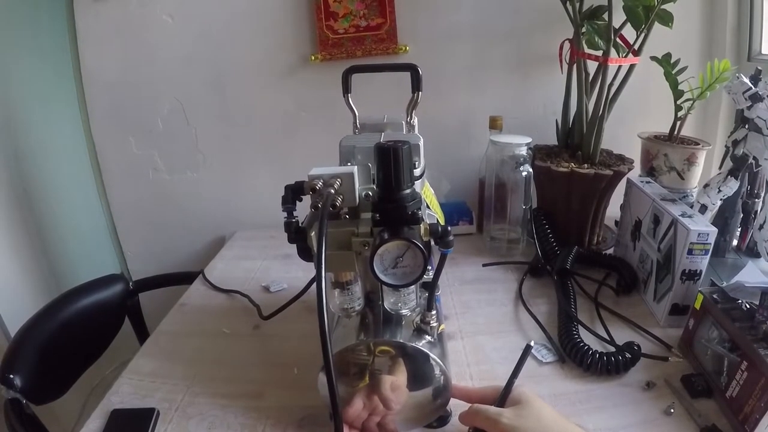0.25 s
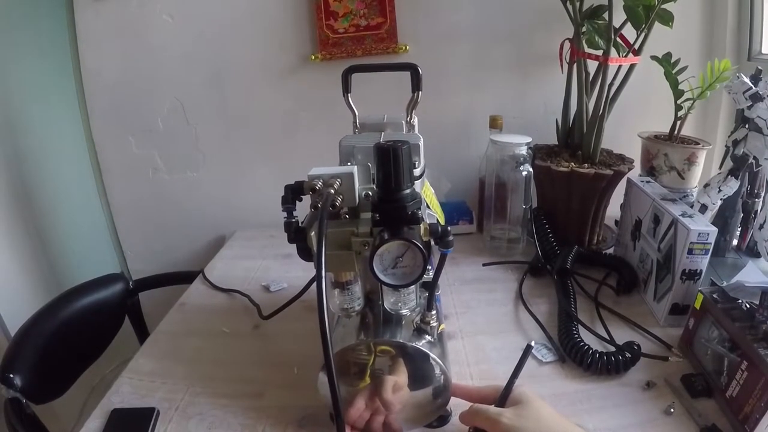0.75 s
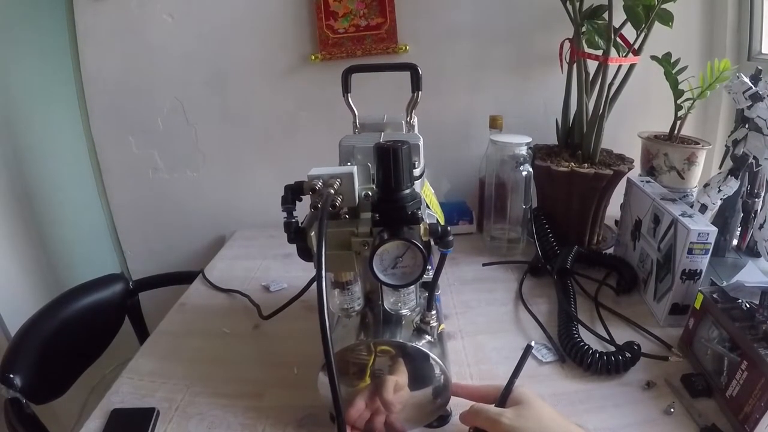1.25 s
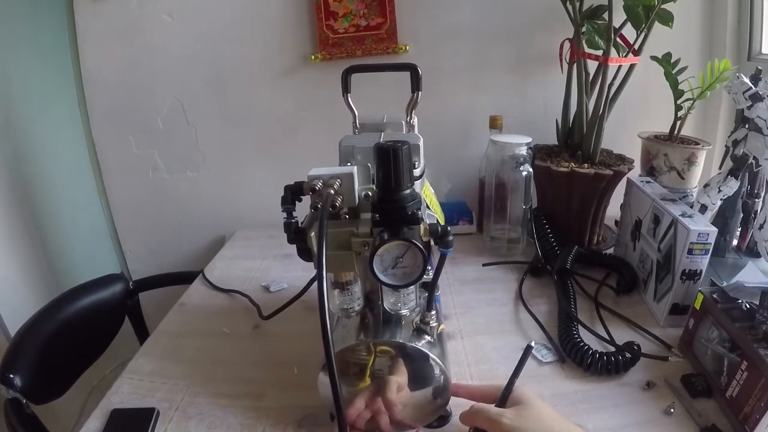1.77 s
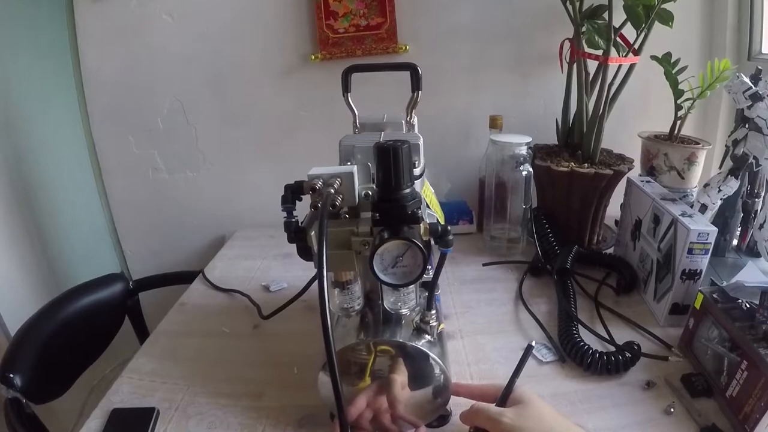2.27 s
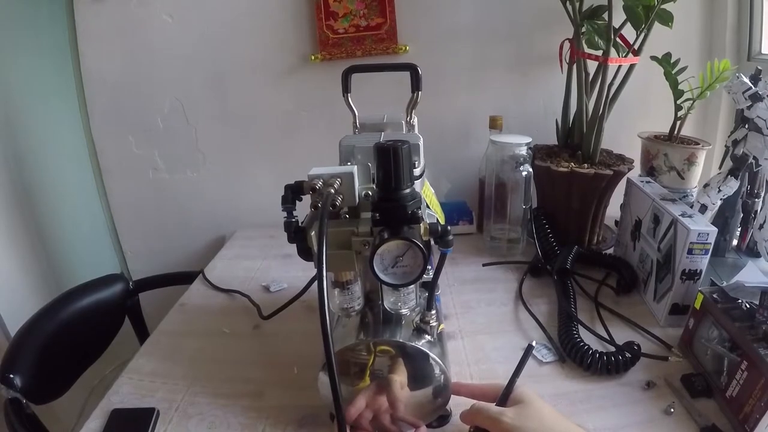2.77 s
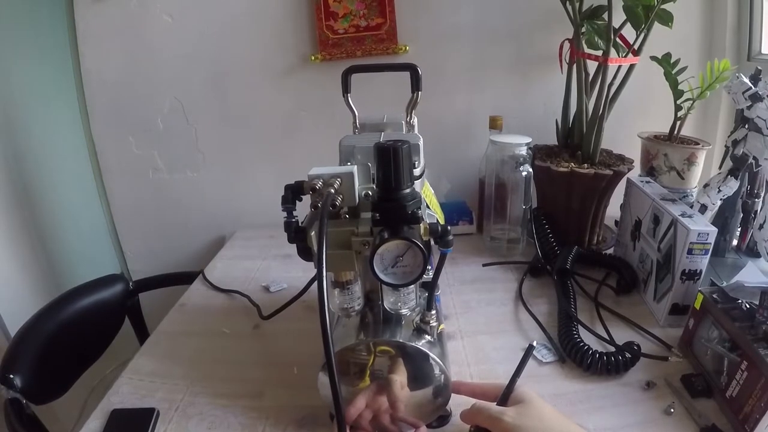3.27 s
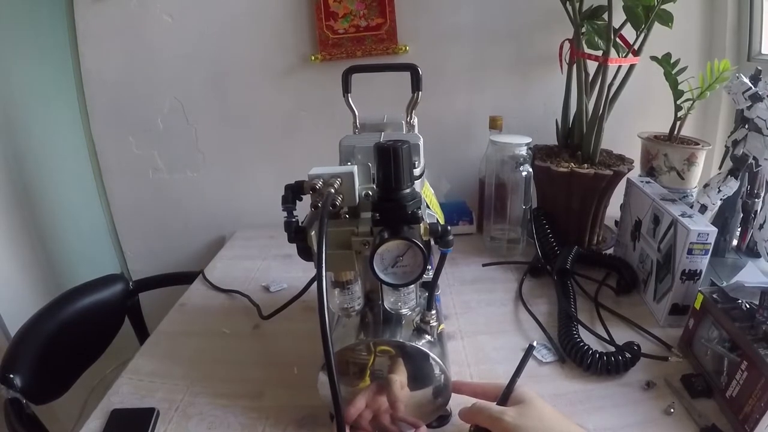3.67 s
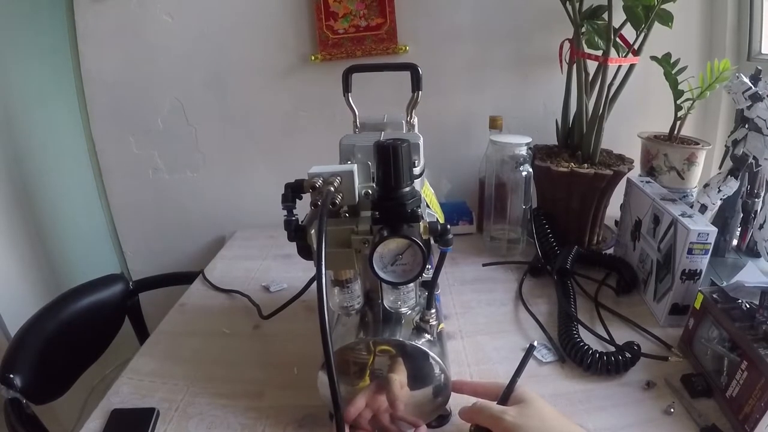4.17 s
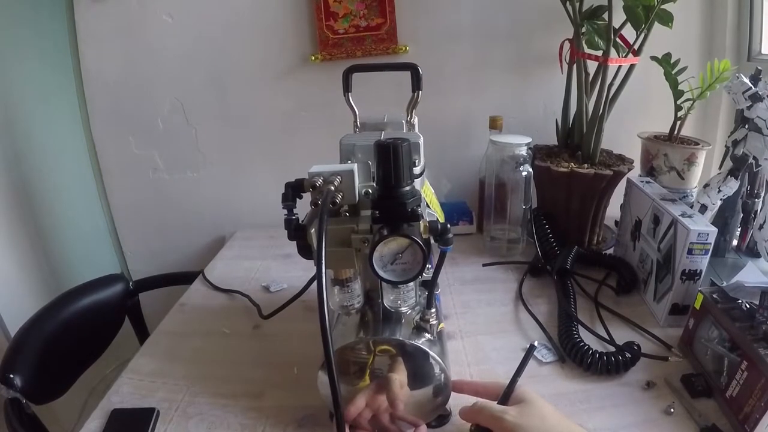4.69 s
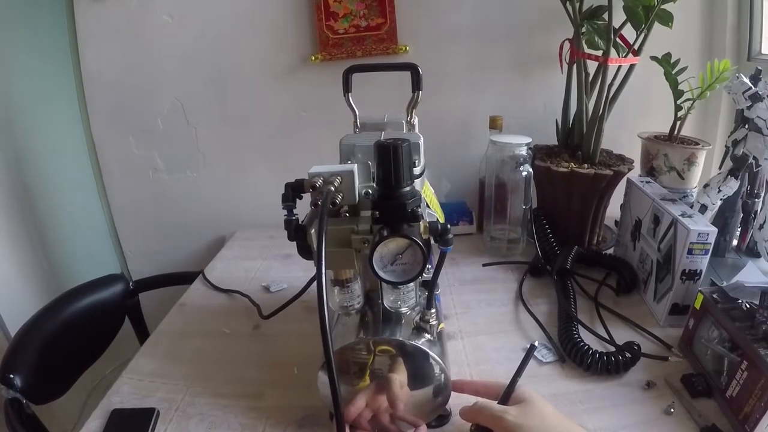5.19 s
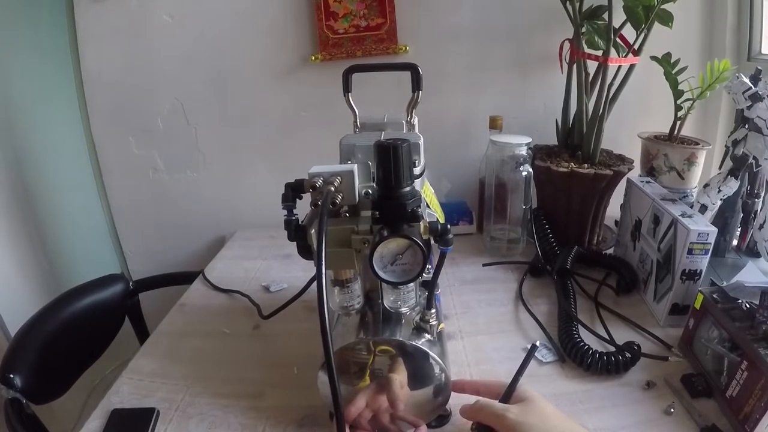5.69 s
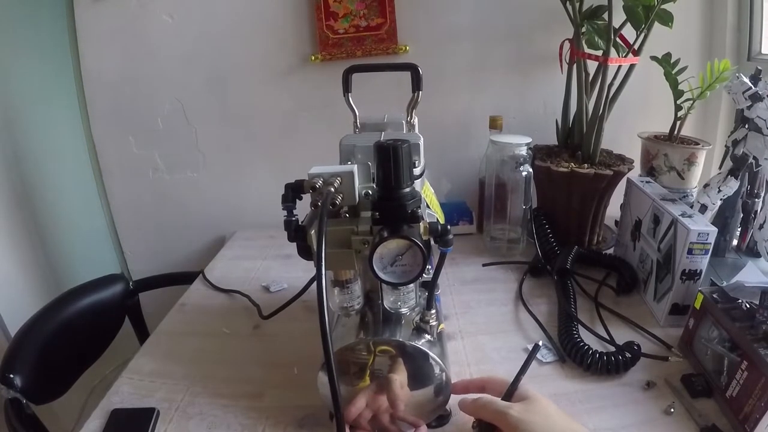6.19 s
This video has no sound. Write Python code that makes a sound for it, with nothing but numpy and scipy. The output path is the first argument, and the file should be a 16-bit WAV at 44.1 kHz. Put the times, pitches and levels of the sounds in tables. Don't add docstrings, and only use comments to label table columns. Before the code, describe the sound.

A small piston compressor runs without pause on a wooden desk in a room, very close to the microphones. A deep hum beats against the fast motor throb, with dull piston knocks, tiny valve clicks, airy rumble and a thin rattle of loose metal. The hum is strongest early; after about four seconds it sinks, the throb turns higher and firmer, and faint air puffs join.

```python
import sys
import numpy as np
from scipy import signal
from scipy.fft import rfft, irfft
from scipy.io import wavfile

SR = 44100
rng = np.random.default_rng(int(sys.argv[2]) if len(sys.argv) > 2 else 0)


def output_pcm(signal):
    pcm = np.clip(np.atleast_2d(signal).T, -1, 1) * 32767
    wavfile.write(sys.argv[1], SR, np.round(pcm).astype(np.int16))


def invert_db(x):
    u = np.asarray(x, float) / 20
    return 10 ** u


N = 284004
TIME, HZ = np.arange(N) / SR, np.arange(N // 2 + 1) * SR / N + 1e-3


def in_time(rows):
    time_s, *columns = np.transpose(rows)
    return [np.interp(TIME, time_s, column) for column in columns]


def at_hz(rows):
    hz, value = np.transpose(rows)
    return np.interp(np.log(HZ), np.log(hz), value)


def shaped(x, gain):
    y = irfft(rfft(x) * gain, N)
    return y / np.sqrt(np.mean(y ** 2))


def band(x, low_hz, high_hz, order=2):
    sos = signal.butter(order, [low_hz, high_hz], "band", fs=SR, output="sos")
    return signal.sosfilt(sos, x)


def drift(rate_hz):
    knots = rng.standard_normal(int(N / SR * rate_hz) + 2)
    return np.interp(TIME * rate_hz, np.arange(len(knots)), 1.2 * knots)


def once_a_turn(crank, angle):
    return np.diff(np.floor(crank - angle), prepend=-1) > 0


# (time [s], speed [turns/s])
CRANK_SPEED = [(0, 21.94), (.5, 21.928), (2, 21.929), (3.1, 21.938), (3.7, 21.948), (4.3, 21.962),
               (6.44, 21.965)]


def crank_angle():
    start_turns = -.011
    return start_turns + np.cumsum(in_time(CRANK_SPEED)[0]) / SR


# (time [s], lead [turns])
HUM_LEAD_TURNS = [(0, -.06), (.4, .18), (1, .28), (2, .34), (2.8, .25), (3.9, .2), (4.4, .27), (6.44, .34)]


def hum_angle():
    hum_hz = 100
    return hum_hz * TIME + in_time(HUM_LEAD_TURNS)[0]


# (time [s], share [0-1])
HAND_WEIGHT = [
    (0, 1),
    (.25, 0.2),
    (.55, 0.01),
    (2.15, 0),
    (2.5, .5),
    (3.7, 0.42),
    (4.15, .95),
    (4.4, 0.95),
    (6.44, 0.98),
]
# (weight share [0-1], hum [dB], fourth order [dB], sixth order [dB], buzz [dB])
DESK_RESPONSE = [
    (0, -13, -24.5, -27, -41),
    (0.499, -14.5, -20, -19.5, -44.5),
    (1, -22.5, -17.5, -14.5, -49.5),
]


def carried():
    share, *columns_db = np.transpose(DESK_RESPONSE)
    weight = in_time(HAND_WEIGHT)[0]
    return [np.interp(weight, share, db) for db in columns_db]


# (frequency [Hz], density [dB per Hz])
RUMBLE_SPECTRUM = [(15, 2), (30, 0.5), (60, 5), (130, -2), (200, -3.5), (420, -10.5), (650, -9.5),
                   (800, -12.5), (1050, -25.5), (1650, -30), (1900, -30.5), (2300, -32.5), (2700, -41.5),
                   (5000, -58.5)]


def rumble():
    noise = rng.standard_normal((3, N))
    return shaped(noise, invert_db(at_hz(RUMBLE_SPECTRUM))) * invert_db(-26.0 + 0.6 * drift(17))


# (crank angle [turns], centre [Hz], width [Hz], level [dB], decay [turns])
AIR_PUFFS = [(.39, 3800, 280, -48, .2), (.8, 3820, 280, -48.5, .13), (.41, 5080, 320, -46, .12)]


def puffs(crank, pressed):
    rise_turns = .03
    out, white = 0, rng.standard_normal((3, N))
    for angle, hz, width_hz, db, decay_turns in AIR_PUFFS:
        since = (crank - angle) % 1
        envelope = (1 - np.exp(-since / rise_turns)) * np.exp(-since / decay_turns)
        air = band(white, hz - width_hz / 2, hz + width_hz / 2)
        out = out + invert_db(db + 1.5 * drift(20)) * envelope * air / air.std()
    return pressed * out


# (crank angle [turns], low [Hz], high [Hz], level [dB])
PISTON_KNOCKS = [(0.059, 700, 960, -23), (0.26, 770, 960, -26), (0.67, 640, 960, -21),
                 (.4, 1050, 1610, -28.5), (0.52, 1450, 2060, -35.5)]


def knocks(crank, shift):
    loaded_gain_db = 3.5
    out = 0
    for angle, low_hz, high_hz, db in PISTON_KNOCKS:
        force = invert_db(db + loaded_gain_db * shift + .6 * drift(20))
        clicks = once_a_turn(crank, angle) * force
        out = out + band(10 * clicks + 1e-18, low_hz, high_hz)
    return out


# (crank angle [turns], force [dB], how squarely it lands [0-1])
VALVE_CONTACTS = [(0.121, -3, 0.07), (0.199, -11, 0), (0.4, -3.5, 0.91), (0.481, -8, 0.4),
                  (0.652, -19, 0.3), (0.849, -2.5, 0.83), (0.972, -8, 0)]
# (frequency [Hz], level [dB], t60 [s])
HEAD_MODES = [(1220, -26.5, 0.055), (1198, -10.5, 0.12), (1249, -6.5, 0.25), (1295, -2, 0.02),
              (1533, 0.5, 0.037), (1518, -3, 0.086), (1576, -4, 0.19), (1632, 4.5, 0.1), (1726, 2, 0.26),
              (1930, -9, 0.043), (2167, -6, 0.046), (2252, 2, 0.13)]


def valves(crank, hum):
    strikes = []
    for angle, db, _ in VALVE_CONTACTS:
        at = np.flatnonzero(np.diff(np.floor(crank - angle)) > 0)
        chance = rng.standard_normal((len(at), 2))
        jitter_samples = (1.2 * chance[:, 0]).astype(int)
        at = np.clip(at + jitter_samples, 0, N - 1)
        sway = 1 + 0.07 * np.cos(2 * np.pi * hum[at])
        strikes.append((at, invert_db(db + .5 * chance[:, 1]) * sway))
    square = np.array(VALVE_CONTACTS)[:, 2]
    mode_shapes = square + rng.uniform(-0.99, 1, (len(HEAD_MODES), len(VALVE_CONTACTS)))
    out = 0
    for (hz, db, t60_s), shape in zip(HEAD_MODES, mode_shapes):
        clicks = np.full(N, 1e-18)
        for (at, force), share in zip(strikes, shape / np.sqrt(np.mean(shape ** 2))):
            clicks[at] += share * force
        r, w = invert_db(-60 / (t60_s * SR)), 2 * np.pi * hz / SR
        ring = signal.lfilter([0, np.sin(w)], [1, -2 * r * np.cos(w), r * r], clicks)
        out = out + invert_db(db) * ring
    out = band(out, 1000, 1900, order=4)
    return out / out.std()


# (frequency [Hz], density [dB per Hz])
BUZZ_LIGHT = [(1410, -45.5), (2400, -12.5), (2910, -7.5), (3160, -8), (3530, -4.5), (4010, -2), (4720, -4),
              (5130, 0.5), (6270, -2.5), (6700, 0), (7890, -10.5), (9790, -12.5), (11100, -30.5),
              (12100, -17), (14200, -30.5)]
BUZZ_HEAVY = [(1410, -35), (2400, -11), (2530, -18), (2910, -8), (3810, -2.5), (4040, -5), (4720, -8),
              (5130, -3), (5600, -5), (6950, -3.5), (8130, -12.5), (8560, -10), (9360, -14), (12100, -20),
              (14200, -36.5)]
# (frequency [Hz], width [Hz], level [dB])
SHELL_LIGHT = [(3160, 54, 10), (3260, 37, 4.5), (3820, 190, 3), (5220, 32, 6), (6090, 57, 8),
               (6700, 91, 5.5), (7320, 35, 9), (8450, 79, 5.5), (9900, 64, 3), (12200, 200, -2)]
SHELL_HEAVY = [(3200, 60, 6.5), (3870, 320, 2.5), (5150, 220, 6.5), (5950, 150, 7), (6550, 120, 5),
               (7350, 40, 4), (8500, 120, 0.5)]
# (lowest frequency [Hz], crank angle [turns], throb [dB])
LOOSE_PARTS = [(2200, 0.39, 1.5), (3120, 0.39, 1), (4420, 0.31, 1), (7600, 0.39, 2), (10400, .44, -0.5)]
SHIFT_S = [3.8, 4.46]


def buzz_colour(thicket, modes, spectrum):
    peaks = 1
    for hz, width_hz, db in modes:
        peaks = peaks + (invert_db(db) - 1) / (1 + (2 * (HZ - hz) / width_hz) ** 2)
    return thicket * peaks * invert_db(at_hz(spectrum)) / (1 + (HZ / 12500) ** 8)


def buzz(shaking, crank, hum, pressed):
    swing = np.abs(signal.hilbert(shaking))
    shared_db = 5.3 * np.log10(swing / swing.mean() + .1) + 0.6 * drift(40)
    burst_db = 2.3 * np.minimum(rng.exponential(1, N), 5)
    grains = rfft(rng.standard_normal((3, N)) * invert_db(burst_db))
    out, tops_hz = 0, [part[0] for part in LOOSE_PARTS[1:]] + [SR / 2]
    for (low_hz, angle, throb_db), top_hz in zip(LOOSE_PARTS, tops_hz):
        throb = throb_db * (1.5 - 1.8 * pressed) * np.cos(4 * np.pi * (crank - angle))
        part = irfft(grains * ((HZ > low_hz) & (HZ <= top_hz)), N)
        out = out + part * invert_db(shared_db + throb + 0.6 * drift(35))
    thicket = invert_db(3.15 * np.interp(HZ / 30, np.arange(800), rng.standard_normal(800)))
    light = shaped(out, buzz_colour(thicket, SHELL_LIGHT, BUZZ_LIGHT))
    heavy = shaped(out, buzz_colour(thicket, SHELL_HEAVY, BUZZ_HEAVY))
    beat_db, beat_turns, creep_db_per_s, flutter_db = 0.95, 0.32, 1.56, 0.6
    sway_db = beat_db * pressed * np.cos(2 * np.pi * (hum - 4.0 * crank - beat_turns))
    creep_db = creep_db_per_s * np.maximum(TIME - SHIFT_S[1], 0)
    level_db = carried()[3] + creep_db + sway_db + flutter_db * drift(20)
    return invert_db(level_db) * ((1 - pressed) * light + pressed * heavy)


ORDER_BLOWS = [(1, .8, .56, 0), (8, .2, .48, 0), (10, .54, .56, -.012), (17, .91, -.03, 0),
               (20, .18, 0, .08), (29, .02, .1, .03)]


def lines(table, crank, base, shift, wobble_db):
    step = 8
    out, time_s = 0, TIME[::step]
    for k, early_db, late_db in table:
        first, angle, lag, spread = [blow for blow in ORDER_BLOWS if blow[0] <= max(k, 1)][-1]
        turns = base[::step] + k * (crank[::step] - angle) + lag + spread * (k - first - 4) ** 2
        waver = np.interp(time_s * 6, np.arange(42), rng.standard_normal(42))
        level = invert_db(early_db + shift[::step] * (late_db - early_db) + wobble_db * waver)
        out = out + level * np.cos(2 * np.pi * turns)
    return np.sqrt(2) * signal.resample_poly(out, step, 1, padtype="smooth")[:N]


# (level before shift [dB], after [dB])
ORDER_LEVELS = [(-47.5, -43), (-24, -26), (-33, -37.5), (-30.5, -41.5), (-47.5, -41), (-47, -43.5),
                (-37.5, -37), (-50.5, -39.5), (-35.5, -34), (-39.5, -38), (-31, -29.5), (-30.5, -28),
                (-35, -32.5), (-33.5, -32), (-44, -38), (-35.5, -32), (-45, -39), (-49.5, -55.5),
                (-42, -38.5), (-57, -52.5), (-33.5, -34), (-43, -39.5), (-41, -38.5), (-42, -38),
                (-57, -62), (-41, -36.5), (-64, -58.5), (-62, -41), (-51.5, -49.5), (-44.5, -42.5)]
# (multiple, level before shift [dB], after [dB])
HUM_SIDEBANDS = [(-3, -46.5, -53.5), (-2, -42, -45.5), (-1, -58, -41), (1, -38.5, -37), (2, -32.5, -51.5),
                 (3, -52, -57.5), (4, -51.5, -43), (18, -33.5, -30), (20, -44.5, -44), (22, -39.5, -40.5),
                 (23, -48.5, -39.5), (24, -38, -41.5), (26, -45, -41)]
# (multiple, level before shift [dB], after [dB])
TWICE_HUM_LINES = [(-4, -33, -41.5), (0, -39.5, -47.5)]


def casing(crank, hum, shift):
    slot_slip_hz = .075
    slots = hum + slot_slip_hz * (TIME - 3.2)
    twice = 2 * hum - .25
    multiples = [k for k in range(1, 33) if k not in (4, 6)]
    orders = [(k, *levels_db) for k, levels_db in zip(multiples, ORDER_LEVELS)]
    tones = lines(orders, crank, 0 * crank, shift, wobble_db=0.78)
    tones = tones + lines(TWICE_HUM_LINES, crank, twice, shift, wobble_db=2.5)
    tones = tones + lines(HUM_SIDEBANDS[:7], crank, hum, shift, wobble_db=1.1)
    tones = tones + lines(HUM_SIDEBANDS[7:], crank, slots, shift, wobble_db=1.1)
    return tones * invert_db(1.5 * np.exp(-TIME / 0.17))


def desk(crank, hum):
    hum_db, fourth_db, sixth_db, _ = carried()
    parts = [(hum_db, hum), (fourth_db, 4 * crank - .3), (sixth_db, 6 * crank - .27)]
    return sum(np.sqrt(2) * invert_db(db + .5 * drift(8)) * np.cos(2 * np.pi * turns) for db, turns in parts)


# (frequency [Hz], left - right [dB])
PORT_BALANCE = [(40, -0.8), (100, -1.13), (200, -1.5), (370, -3.5), (520, -7), (700, -17.5), (900, -7.5),
                (1240, -5.5), (1550, -1), (5000, -1), (8000, -1.5), (14000, -8)]
# (frequency [Hz], lead [rad])
PORT_PHASE = [(150, 0), (450, -.12), (600, 0), (750, 1.4), (1000, 2.0), (1350, 2.1), (1650, 1.6),
              (2100, .9), (2600, 0)]
# (frequency [Hz], left-right likeness [0-1])
PORT_LIKENESS = [(200, 1), (600, 0.92), (1300, 0.93), (2500, 0.38), (5000, 0.67), (8000, 0.13),
                 (14000, 0.34)]


def ports(direct, diffuse):
    alike = np.clip(at_hz(PORT_LIKENESS), 0, 1)
    shared, *own = rfft(diffuse)
    ratio = invert_db(at_hz(PORT_BALANCE)) * np.exp(1j * at_hz(PORT_PHASE))
    gains = np.array([ratio, 1 + 0 * ratio]) * 2 / (1 + ratio)
    ramp = direct[0] + (direct[-1] - direct[0]) * TIME / TIME[-1]
    common = rfft(direct - ramp) + np.sqrt(alike) * shared
    return ramp + irfft(gains * common + np.abs(gains) * np.sqrt(1 - alike) * own, N)


def scene():
    crank, hum = crank_angle(), hum_angle()
    shift = np.interp(TIME, SHIFT_S, [0, 1])
    pressed = np.clip(2 * in_time(HAND_WEIGHT)[0] - 1, 0, 1)
    shaking = desk(crank, hum)
    clicks = invert_db(-47.0 + 1.2 * shift) * valves(crank, hum)
    direct = shaking + casing(crank, hum, shift) + clicks + knocks(crank, shift)
    diffuse = rumble() + buzz(shaking, crank, hum, pressed) + puffs(crank, pressed)
    return ports(direct, diffuse)


def band_limit(x):
    return signal.sosfilt(signal.butter(12, 14300, fs=SR, output="sos"), x)


def record(dry):
    mix = invert_db(.7) * .9 * np.tanh(dry / .95)
    return band_limit(mix)


dry = scene()
out = record(dry)
output_pcm(out)
```